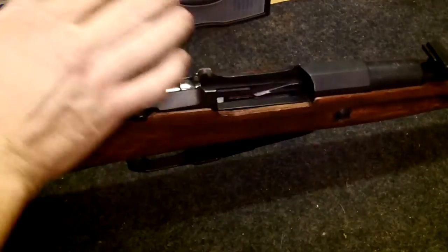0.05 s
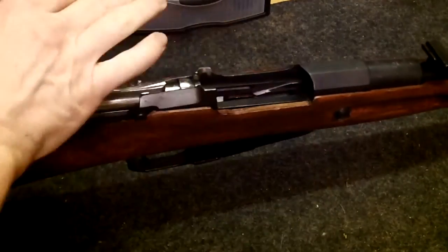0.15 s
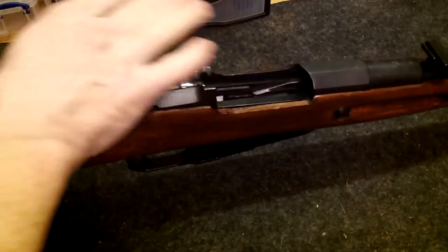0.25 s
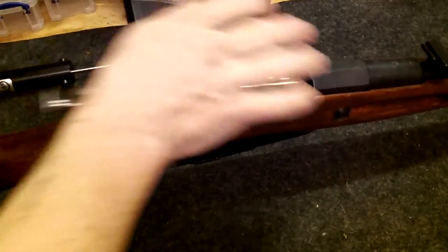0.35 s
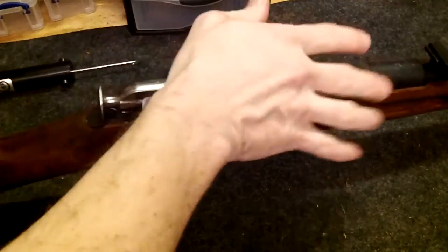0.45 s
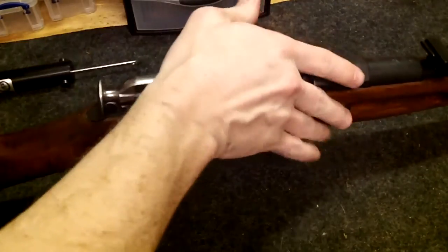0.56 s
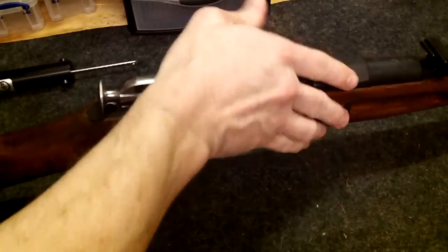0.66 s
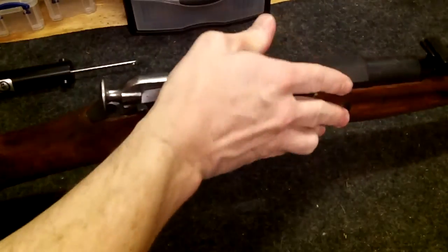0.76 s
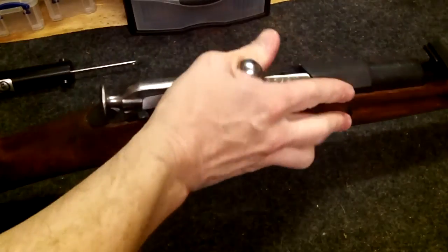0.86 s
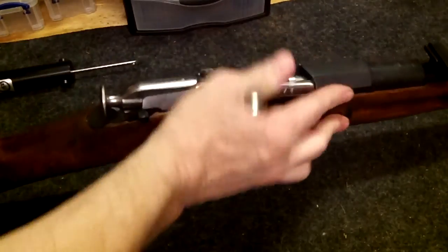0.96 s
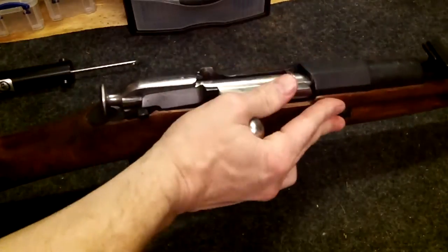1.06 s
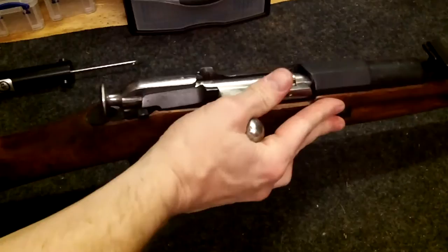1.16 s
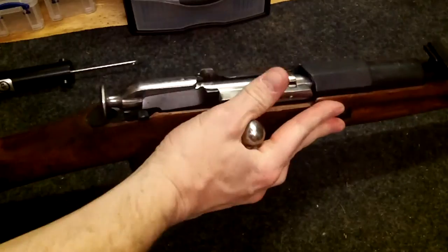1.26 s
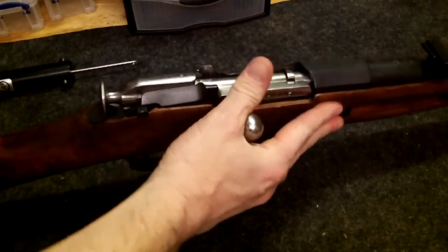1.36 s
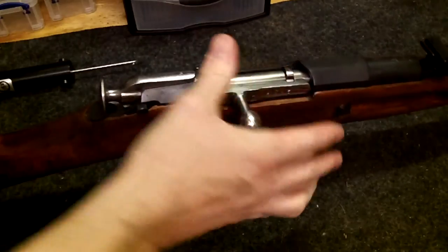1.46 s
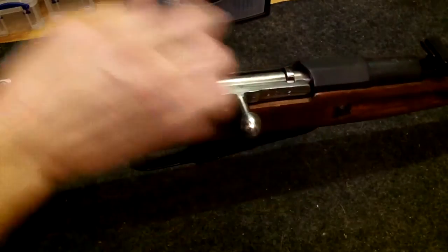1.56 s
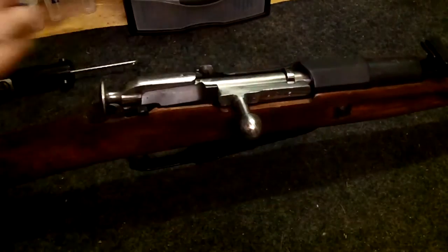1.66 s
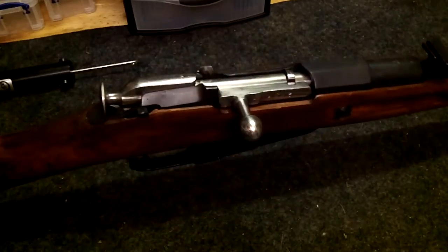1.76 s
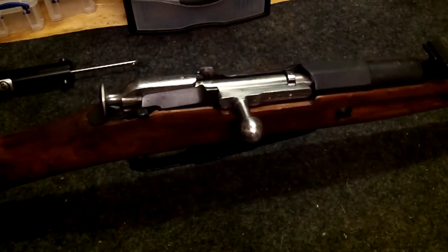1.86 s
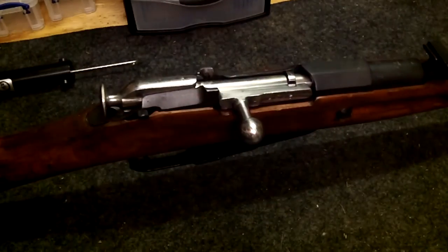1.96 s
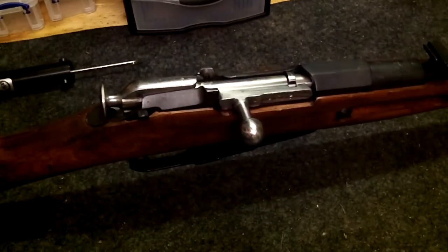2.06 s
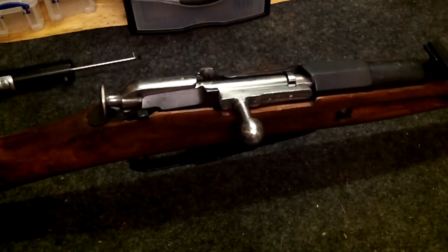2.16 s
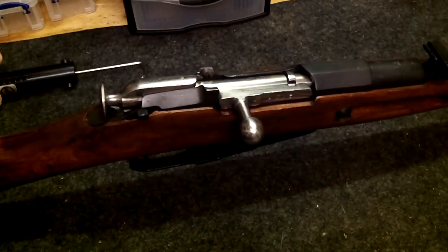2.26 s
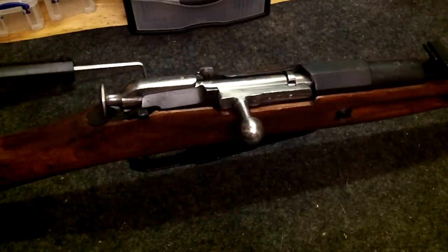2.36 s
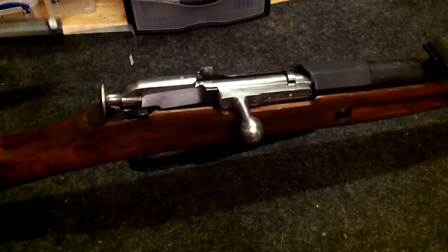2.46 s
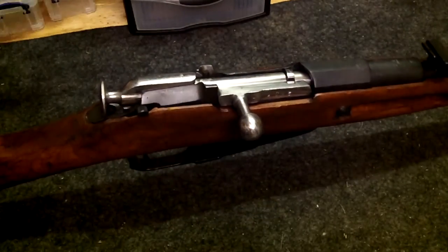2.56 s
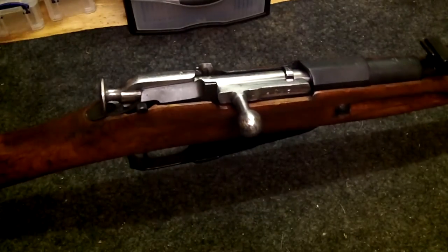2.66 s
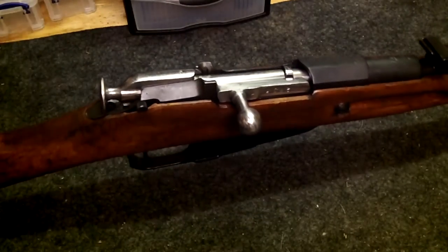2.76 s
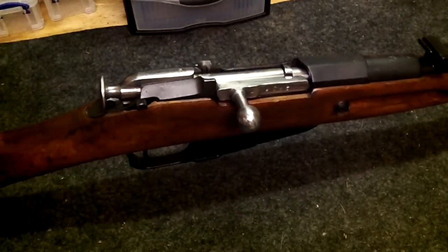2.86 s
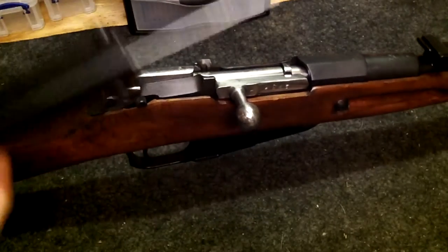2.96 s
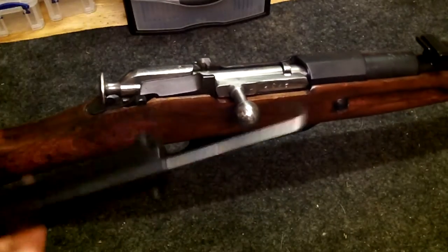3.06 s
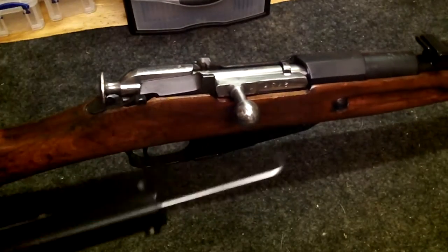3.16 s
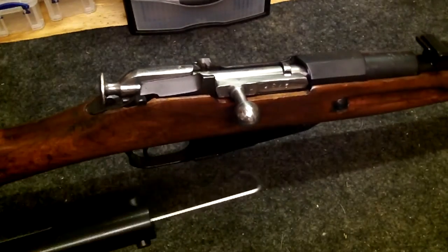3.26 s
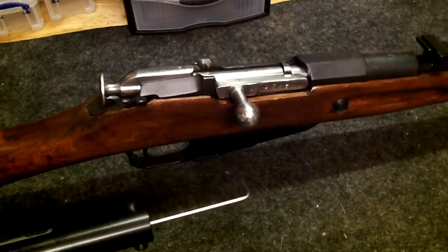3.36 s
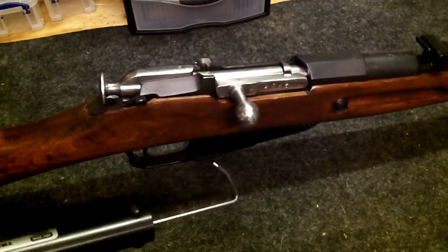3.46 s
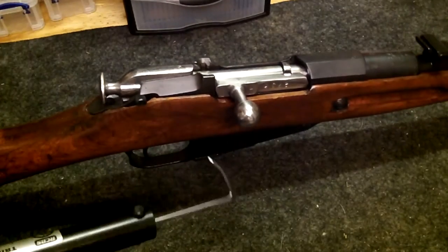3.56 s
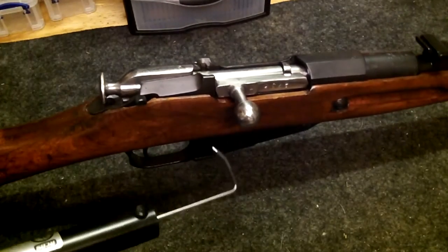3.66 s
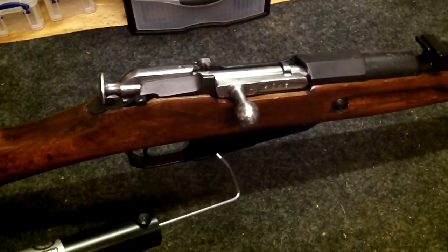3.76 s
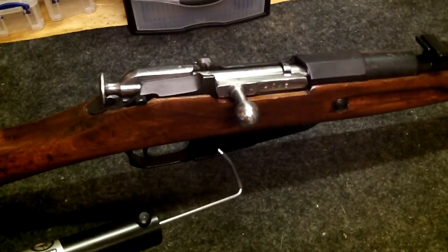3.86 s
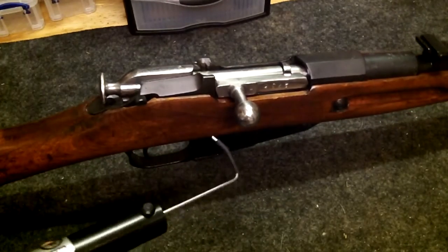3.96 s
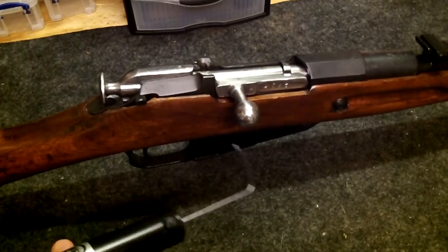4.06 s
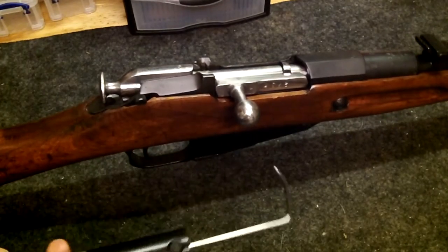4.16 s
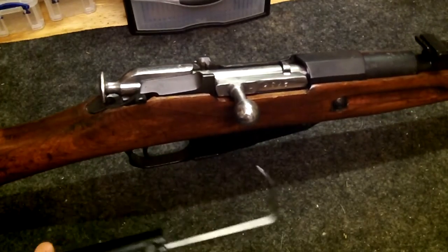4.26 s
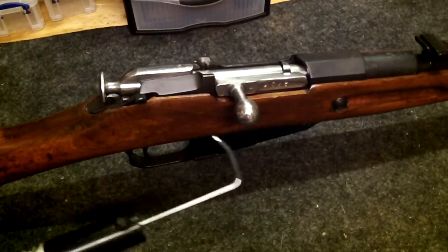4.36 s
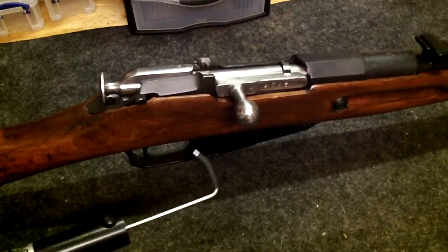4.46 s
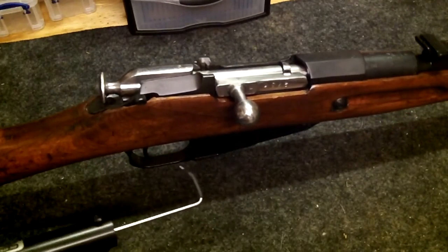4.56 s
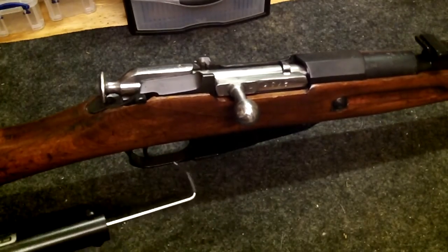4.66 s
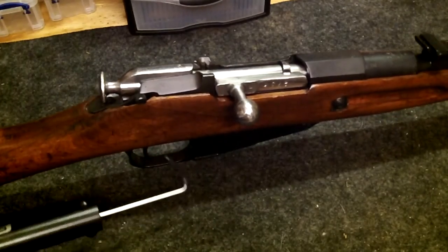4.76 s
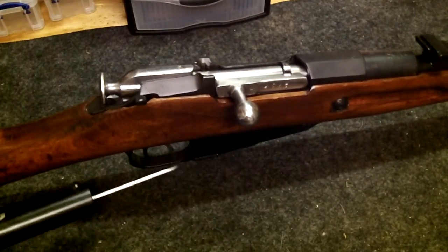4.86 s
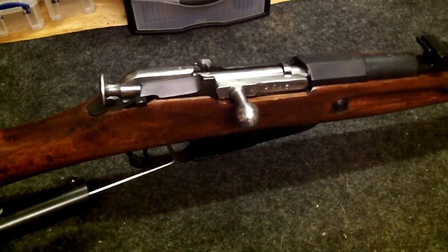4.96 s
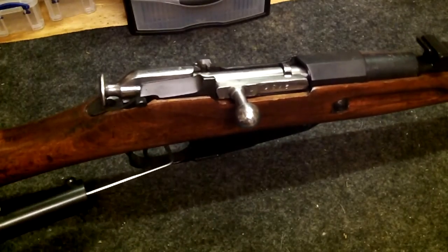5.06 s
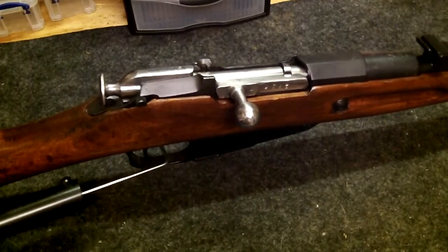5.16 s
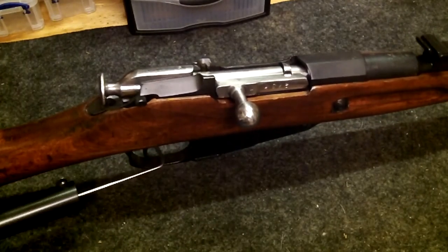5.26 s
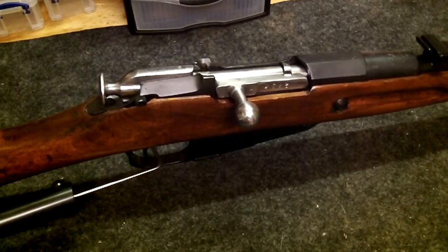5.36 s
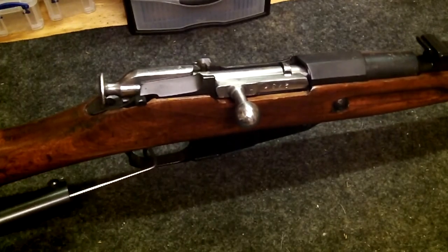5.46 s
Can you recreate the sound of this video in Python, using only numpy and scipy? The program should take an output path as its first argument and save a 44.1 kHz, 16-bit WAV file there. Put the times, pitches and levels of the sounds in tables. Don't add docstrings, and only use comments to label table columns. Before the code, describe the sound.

A steel rifle bolt is shoved home, slammed and turned down in loud clattering knocks, then a metal gauge clicks and its hook ticks faintly.

```python
import sys
import numpy as np
from scipy import signal
from scipy.fft import rfft, irfft
from scipy.io import wavfile

SR = 44100
rng = np.random.default_rng(int(sys.argv[2]) if len(sys.argv) > 2 else 0)


def linear_from_db(decibels):
    return 10 ** (np.asarray(decibels, float) / 20)


def dump(signal):
    limited = np.clip(np.atleast_2d(signal).T, -1, 1)
    pcm = np.round(limited * 32767).astype(np.int16)
    wavfile.write(sys.argv[1], SR, pcm)


N = 243431

# start_s, peak_db, lead_mode_hz, top_octave_tick_db, chatter_ms
BOLT_PUSH = [(0.3228, -13.5, 4600, -24, 0.45), (0.3549, -10.5, 3450, -38, 0.39),
             (0.3571, -6.5, 3630, -9.5, 1.1), (0.3637, 0.5, 5080, -21, 0.53), (0.3763, -30, 3200, -8, 1.5),
             (0.3791, 0, 3700, -14, 3.4), (0.392, -9, 3400, -24, 2.5), (0.397, -9, 3250, -22, 2.6),
             (0.4014, -9.5, 3100, -22, 4.5), (0.4122, -13, 2730, -27, 4.2), (0.42, -8, 2540, -36, 3.8),
             (0.4345, -11, 3330, -32, 0.64), (0.4398, -4, 5240, -23, 2.4), (0.4438, -5, 4120, -26, 3.3),
             (0.4506, -20, 3230, -30, 6.3), (0.4572, -13, 4250, -33, 0.65), (0.4747, -6.5, 2610, -15, 1),
             (0.4815, -5.5, 5450, -25, 3), (0.5019, -20, 4800, -30, 7.8), (0.5085, 8.5, 4260, -16, 3.1),
             (0.5187, -27, 3880, -24, 2.7)]
# start_s, peak_db, lead_mode_hz, top_octave_tick_db, chatter_ms
BOLT_LOCK = [(0.7244, -26, 2690, -31, 2.9), (0.7585, -14, 3500, -35, 1.9), (0.768, -6, 2660, -37, 3.8),
             (0.7787, 6, 2900, -12, 6.7), (0.7856, -26, 3450, -4, 1.1), (0.9214, -22.5, 4060, -46, 4),
             (1.0353, -23, 3320, -49, 1.2), (1.0416, -26.5, 2030, -27, 2.6), (1.0497, -16.5, 2120, -51, 24),
             (1.0607, -17, 2780, -47, 9.4), (1.0768, 2, 3780, -18, 2.6), (1.0821, -14, 2860, -36, 2.5),
             (1.0996, 1.5, 3720, -12, 1.8), (1.1056, -15, 4600, -20, 5.1), (1.2887, -40, 2900, -12, 3.6),
             (1.3933, -35.5, 3420, -21, 0.33), (1.4375, -31.5, 3150, -16, 4.1)]
# start_s, peak_db, lead_mode_hz, top_octave_tick_db, chatter_ms
GAUGE = [
    (2.2514, -26.5, 2040, -28, 3.6),
    (2.2832, -27.5, 1930, -26, 5.4),
    (2.294, -18.5, 3650, -19, 3.6),
    (2.4399, -3, 4820, -28, 0.35),
    (2.4578, -8.5, 2680, -20.5, 4.8),
    (2.468, -14, 2600, -31, 4.2),
    (2.4844, -28, 2520, -32, 5),
    (2.6557, -29.5, 2610, -31, 1.9),
    (2.9031, -34.5, 3240, -13, 3.5),
    (3.002, -36, 2850, -19, 5.2),
]
# start_s, peak_db, lead_mode_hz, top_octave_tick_db, chatter_ms
GAUGE_BODY = [
    (2.2945, -19.5, 2050, -37, 0.99),
    (2.44, -12, 2100, -40, 1.3),
    (2.4585, -15, 5070, -40, 4),
    (2.2945, -29, 3480, -40, 4),
    (4.166, -27, 2650, -40, 1.9),
    (4.336, -41, 3260, -40, 7.4),
]
# start_s, peak_db, lead_mode_hz, top_octave_tick_db, chatter_ms
HOOK = [
    (3.6723, -28, 1870, -14, 3.9),
    (4.0438, -30.5, 3010, -26, 3.7),
    (4.142, -34, 2600, -21, 5.3),
    (4.1649, -15.5, 3670, -18, 0.88),
    (4.1828, -22, 3760, -32, 2.5),
    (4.2145, -30.5, 3200, -27, 6.3),
    (4.2962, -30, 3820, -15, 7.9),
    (4.33, -36, 3240, -27, 6),
    (4.4605, -37.5, 2800, -14, 7.2),
    (4.5305, -47, 3180, -26, 6.4),
]
# frequency_hz, density_db
BOLT_STEEL = [(500, -41), (900, -6), (1500, -10), (2200, -13.5), (2700, -1.5), (3300, -2), (4200, 2.5),
              (5200, -4.5), (6300, -7), (7400, -13), (8200, -61), (16000, -99)]
# mode_hz, level_db
GAUGE_STEEL = [(1250, -8), (1700, -13.5), (2050, 3.5), (2350, -9), (2640, -7), (3000, -2.5), (3400, 1),
               (3800, 5.5), (4300, 0.5), (5000, 4.5), (5400, 3), (5800, 2.5), (6400, 5.5), (7000, 0)]
# start_s, stop_s, start_db, stop_db
SLIDE = [
    (0.356, 0.459, -32, -22.5),
    (0.46, 0.512, -54, -18),
    (0.76, 0.778, -60, -10.5),
    (1.032, 1.082, -41, -25),
]
# peak_time_s, level_db, ringing_hz, rise_s, fall_s (each over 12 dB)
RATTLE = [(.2, -53.5, 4460, 0.4, 0.57), (1.42, -54, 3200, .065, 0.11), (2.17, -54, 3280, 0.091, 0.14),
          (2.3, -43, 3750, 0.026, 0.036), (2.3, -42.5, 2600, 0.026, .04), (2.475, -32, 2630, 0.023, 0.046),
          (2.475, -39, 5050, 0.031, 0.039), (2.95, -56.5, 3500, 0.43, .12), (3.77, -48, 2920, .09, 0.07),
          (4.05, -48, 3120, 0.024, 0.046), (4.18, -43, 3740, .02, .06), (4.21, -46, 2730, 0.093, 0.043),
          (4.345, -46.5, 3260, 0.09, 0.05), (4.46, -52.5, 2730, 0.08, .04), (4.53, -52, 3180, .05, .06)]
# start_s, peak_db, centre_hz
THUDS = [(0.324, -33.5, 1010), (0.373, -33, 1020), (0.398, -28.5, 395), (0.42, -22, 387),
         (0.445, -21, 1040), (0.466, -27.5, 357), (0.508, -20.5, 209), (0.531, -38, 235),
         (0.779, -15, 1010), (1.04, -31, 940), (1.075, -30, 272), (1.099, -17, 464), (1.141, -29.5, 410),
         (1.164, -31, 940), (2.455, -52, 232)]
# mode_hz, level_db, t60_s
STOCK = [(165, 10, 0.038), (236.3, 1.5, 0.21), (393.4, 7.5, .1), (426.6, 1.5, 0.13), (594, 11, 0.027),
         (940, 5, 0.041), (1239, 5.5, 0.085)]
# peak_time_s, level_db
HANDLING = [
    (.55, -49.5),
    (.77, -48),
    (1.086, -44),
    (1.33, -53),
]
# frequency_hz, density_db
ROOM = [(180, -16), (300, -11), (591, -32), (640, -33), (726, -37), (964, -18), (1340, -33), (1450, -7),
        (4240, -2), (7030, -12.5), (7970, -45), (11800, -36), (13000, -61)]
# mode_hz, level_db
ECHO_LINES = [(1459, -22.5), (2810, -37), (3580, -14.5), (4037, -10), (4226, -16), (4904, -13.5),
              (5965, -15.5)]
# frequency_hz, density_db
HISS = [(12, -34), (20, -2.5), (120, -0.5), (279, 0), (577, -1), (956, -1.5), (2500, -5), (4720, -7),
        (6400, -10.5), (7500, -18), (8200, -17), (9500, -11.5), (14800, -12.5), (15600, -13.5)]

PUSH_OCT, LOCK_OCT, GAUGE_OCT, BODY_OCT, HOOK_OCT, BRIEF_OCT = 0.52, 0.53, 0.59, 0.28, 0.6, 0.41
HOOK_HZ, HOOK_TILT_DB_PER_OCT = 3200, -8
SLIDE_EDGE_DB_PER_S = 1300
RATTLE_T60_S, RATTLE_OCT, RATTLE_LEAD_DB = 0.019, 0.33, 3
SOFT_REACH_OCT, HARD_REACH_OCT, SOFT_DB, HARD_DB, SOFT_RISE_S = 0.54, 0.87, -22, -19.5, 0.0045
BUMP_HZ, BUMP_T60_S, BUMP_DB = 196, 0.02, -8.5
ROCK_RISE_S, ROCK_FALL_S = 0.059, 0.11
ROOM_DB, ROOM_T60_S, QUICK_T60_S = -14.5, 1.12, 0.16
GATE_DB, GATE_SOFT_DB, GATE_RATIO, BUSY_DB = -22, 1.5, 4.3, 15
DUCK_DB, DUCK_T60_S, DUCK_FROM_DB, DUCK_SPAN_DB = 0.5, 0.17, -25, 10
HISS_DB, SWELL_DB, SWELL_FROM_DB, SWELL_SPAN_DB = -47, 8.5, -30.5, 15
SETTLE_DB, SETTLE_S = 2, 0.92
SEAM_HZ, SEAM_HALF_HZ, FRAY_HZ, EDGE_HZ = 7860, 160, 600, 1100
TOP_HZ, TOP_LOSS_HZ, LOAD_T60_S, LOAD_FROM_DB, LOAD_SPAN_DB = 15380, 3400, 0.67, -25, 7.5


def level(x, db):
    return x * linear_from_db(db) / np.sqrt(np.mean(x ** 2))


def colour(x, points):
    hz, db = np.transpose(points)
    f = np.fft.rfftfreq(len(x), 1 / SR) + 1
    return irfft(rfft(x) * linear_from_db(np.interp(np.log(f), np.log(hz), db)), len(x))


def band(x, lo_hz, hi_hz, order=3):
    sos = signal.butter(N=order, Wn=[lo_hz, hi_hz], btype="band", fs=SR, output="sos")
    return signal.sosfilt(sos, x)


def ring(hz, gain, t60, size=4096):
    t = np.arange(size) / SR
    modes = np.sin(2 * np.pi * hz[:, None] * t) * linear_from_db(-60 * t / t60[:, None])
    return np.sum(gain[:, None] * modes, axis=0)


def add(out, s, x):
    i = int(s * SR)
    out[i:i + len(x)] += x[:len(out) - i]


def swell(s, db, rise_s, fall_s):
    t = np.arange(N) / SR - s
    return linear_from_db(db - 12 * np.maximum(-t / rise_s, t / fall_s))


def stored(x, t60):
    keep = linear_from_db(-2 * 60 / t60 / SR)
    built = signal.lfilter([0.006], [1, -0.994], x ** 2)
    return signal.lfilter([1 - keep], [1, -keep], built) + 1e-12


def load(x, t60, from_db, span_db):
    return np.clip((10 * np.log10(stored(x, t60)) - from_db) / span_db, 0, 1)


def slips(rate, scatter_db):
    struck = rng.random(N) < rate / SR
    return struck * rng.standard_normal(N) * linear_from_db(scatter_db * rng.exponential(size=N))


def knocks(events, reach_oct, modes_hz, modes_db, stray_hz, t60, lead_db, scatter_db):
    out, t = np.zeros(N), np.arange(2048) / SR
    for s, peak_db, centre_hz, tick_db, chatter_ms in events:
        spread_oct = reach_oct * (1 + BRIEF_OCT / max(chatter_ms, 0.4))
        luck = rng.standard_normal((2, len(modes_hz) + 1))
        noise = rng.standard_normal((3, 2048))
        hz = np.append(centre_hz, modes_hz + stray_hz * luck[0, 1:])
        db = np.append(lead_db, modes_db + scatter_db * luck[1, 1:])
        near = np.exp(-0.25 * (np.log2(hz / centre_hz) / spread_oct) ** 2)
        fade = np.exp(-(t / (chatter_ms / 1000)) ** 2.5) + 0.23 * np.exp(-t / 0.004)
        contact = noise[0] * fade * (0.5 + np.exp(-t / 0.0014))
        contact[0] += 7
        contact = irfft(np.exp(1j * np.angle(rfft(contact))))
        contact = contact * np.sqrt(fade) * (1.5 + np.exp(-t / 0.00083))
        gain = near * linear_from_db(db) * (-1.0) ** np.arange(len(hz))
        body = ring(hz, gain, t60 * (hz / 3000) ** -0.4, size=2048)
        knock = band(signal.fftconvolve(contact, body)[:2048], 827, 7630, order=6)
        top_hz = np.interp(peak_db, [-5, -1], [12300, 14600])
        tick = band(noise[1] * fade * np.exp(-t / 0.0065), 8700, top_hz, order=5)
        tick += band(noise[2] * 0.24 * linear_from_db(-60 * t / 0.034), 9050, 10000, order=5)
        knock = knock / np.abs(knock).max()
        tick = linear_from_db(tick_db) * tick / np.abs(tick).max()
        add(out, s, linear_from_db(peak_db) * (knock + tick))
    return out


def bolt_knocks():
    steel_hz, steel_db = np.transpose(BOLT_STEEL)
    hz = np.linspace(1000, 7400, num=40)
    db = 0.58 * np.interp(np.log(hz), np.log(steel_hz), steel_db)
    bolt = hz, db, 57.5, 0.012, 1.6, 3.3
    return knocks(BOLT_PUSH, PUSH_OCT, *bolt) + knocks(BOLT_LOCK, LOCK_OCT, *bolt)


def gauge_knocks():
    hz, db = np.transpose(GAUGE_STEEL)
    hook_db = db + HOOK_TILT_DB_PER_OCT * np.abs(np.log2(hz / HOOK_HZ))
    ringing = 38.0, 0.022, 8.0, 2.9
    gauge = knocks(GAUGE, GAUGE_OCT, hz, db, *ringing)
    hook = knocks(HOOK, HOOK_OCT, hz, hook_db, *ringing)
    return gauge + hook + knocks(GAUGE_BODY, BODY_OCT, hz, db, *ringing)


def slide():
    t, gain = np.arange(N) / SR, np.zeros(N)
    drop_db = 0.1 * SLIDE_EDGE_DB_PER_S
    for a, b, a_db, b_db in SLIDE:
        times = [a - 0.1, a, b, b + 0.1]
        gain += linear_from_db(np.interp(t, times, [a_db - drop_db, a_db, b_db, b_db - drop_db]))
    return gain * level(colour(slips(7000, 2), BOLT_STEEL), 0)


def rattle():
    steel_hz, steel_db = np.transpose(GAUGE_STEEL)
    out, tremble = np.zeros(N), slips(1300, 0.82)
    for s, level_db, centre_hz, rise_s, fall_s in RATTLE:
        hz = np.append(centre_hz, steel_hz)
        db = np.append(RATTLE_LEAD_DB, 0.5 * steel_db)
        near = np.exp(-(np.log2(hz / centre_hz) / RATTLE_OCT) ** 2)
        modes = ring(hz, near * linear_from_db(db), np.full(len(hz), RATTLE_T60_S), size=2048)
        rung = signal.fftconvolve(tremble, modes)[:N]
        out += swell(s, level_db, rise_s, fall_s) * level(rung, 0)
    return band(out, 1800, 6500)


def stock():
    out, (hz, db, t60) = np.zeros(N), np.transpose(STOCK)
    for s, peak_db, centre_hz in THUDS:
        hard = np.clip((peak_db - SOFT_DB) / (HARD_DB - SOFT_DB), 0, 1)
        reach_oct = SOFT_REACH_OCT + hard * (HARD_REACH_OCT - SOFT_REACH_OCT)
        near = np.exp(-(np.log2(hz / centre_hz) / reach_oct) ** 2) + 0.048 * hard
        gain = near * linear_from_db(db + 2 * rng.standard_normal(len(hz)))
        wood = signal.fftconvolve(np.hanning(40), ring(hz, gain, t60, size=8192))
        wood = wood * (1 - (1 - hard) * np.exp(-np.arange(len(wood)) / SR / SOFT_RISE_S))
        bump = ring(np.array([BUMP_HZ]), linear_from_db(np.array([peak_db + BUMP_DB])), np.array([BUMP_T60_S]))
        add(out, s, hard * bump)
        add(out, s, linear_from_db(peak_db) * wood / np.abs(wood).max())
    rocking = sum(swell(s, db, ROCK_RISE_S, ROCK_FALL_S) for s, db in HANDLING)
    return out + rocking * level(band(rng.standard_normal(N), 17, 74), 0)


def room(x):
    energy = stored(x, ROOM_T60_S)
    heard_db = 10 * np.log10(energy + linear_from_db(2 * BUSY_DB) * stored(x, QUICK_T60_S))
    through_db = -GATE_RATIO * GATE_SOFT_DB * np.logaddexp(0, (GATE_DB - heard_db) / GATE_SOFT_DB)
    through_db -= DUCK_DB * load(x, DUCK_T60_S, DUCK_FROM_DB, DUCK_SPAN_DB)
    wash = level(colour(rng.standard_normal(N), ROOM), ROOM_DB)
    for hz, db in ECHO_LINES:
        wash += level(band(rng.standard_normal(N), hz - 15, hz + 15, order=1), ROOM_DB + db)
    return wash * np.sqrt(energy) * linear_from_db(through_db)


def hiss(steel):
    gain_db = SWELL_DB * load(steel, QUICK_T60_S, SWELL_FROM_DB, SWELL_SPAN_DB)
    gain_db += SETTLE_DB * np.exp(-np.arange(N) / SR / SETTLE_S)
    return level(colour(rng.standard_normal(N), HISS), HISS_DB) * linear_from_db(gain_db)


def starve(x, steel):
    top_hz = TOP_HZ - TOP_LOSS_HZ * load(steel, LOAD_T60_S, LOAD_FROM_DB, LOAD_SPAN_DB)
    f, t, z = signal.stft(x, SR, nperseg=2048, noverlap=1024)
    chance = rng.random((len(f) // 5 + 1, len(t) // 2 + 1))
    chance = np.repeat(np.repeat(chance, 5, axis=0), 2, axis=1)[:len(f), :len(t)]
    off = np.abs(f - SEAM_HZ)[:, None]
    top = np.interp(t, np.arange(N) / SR, top_hz)
    strain = np.clip((15700 - top) / 2500, 0, 1) * (f > SEAM_HZ)[:, None]
    frayed = chance < 0.5 * np.exp(-off / FRAY_HZ) + 0.45 * strain
    above = chance < 0.5 + (f[:, None] - top) / (400 + EDGE_HZ * strain)
    lost = (off < SEAM_HALF_HZ) | frayed | above
    return signal.istft(z * np.where(lost, linear_from_db(-70), 1), SR, nperseg=2048)[1][:N]


def scene():
    blows = bolt_knocks() + gauge_knocks()
    scrape = slide()
    steel = blows + scrape
    quiet = scrape + rattle() + room(steel) + hiss(steel)
    return (blows + stock() + starve(quiet, steel))[None]


def top_cut(x):
    return signal.sosfilt(signal.butter(12, 16350, fs=SR, output="sos"), x)


def record(dry):
    return top_cut(np.clip(dry, -1, 1))


dry = scene()
out = record(dry)
dump(out)
```